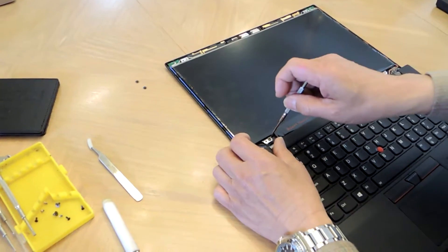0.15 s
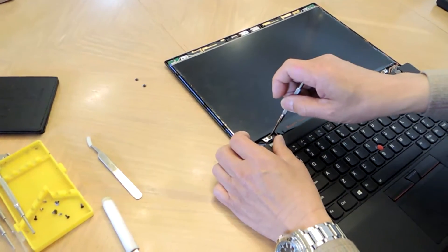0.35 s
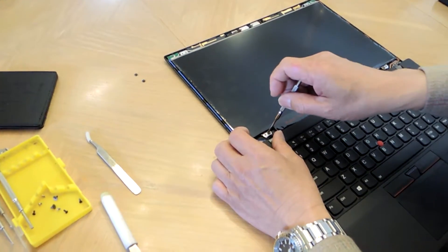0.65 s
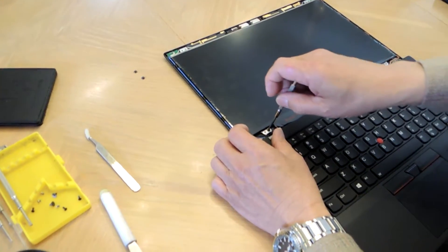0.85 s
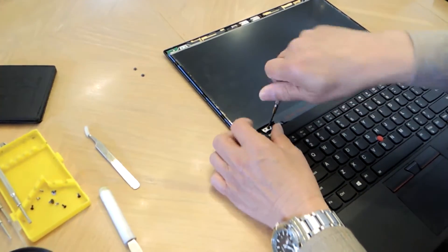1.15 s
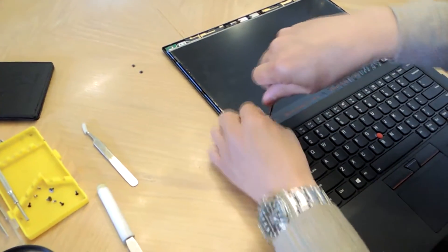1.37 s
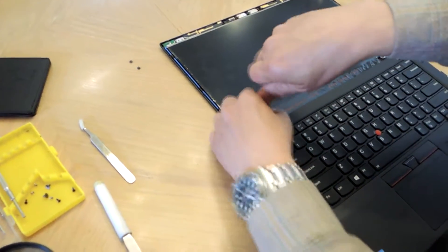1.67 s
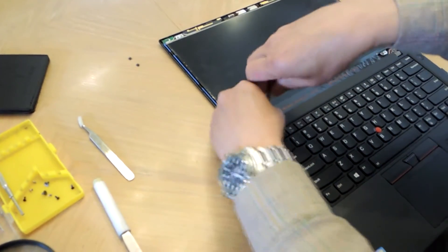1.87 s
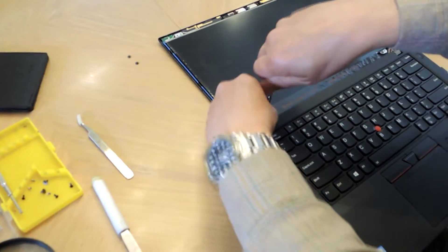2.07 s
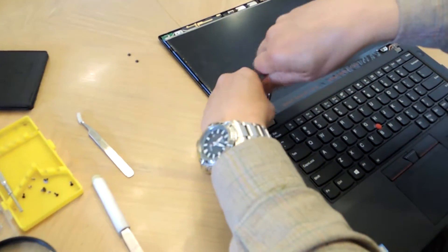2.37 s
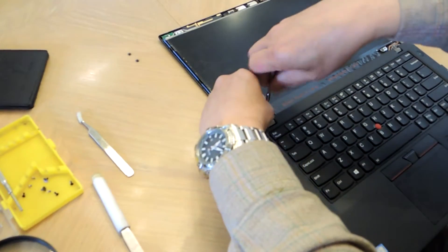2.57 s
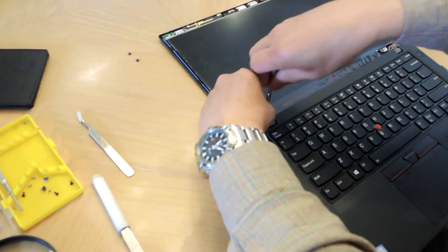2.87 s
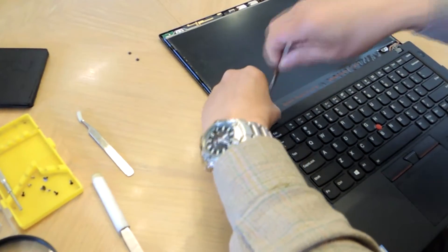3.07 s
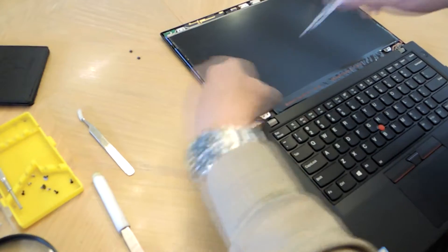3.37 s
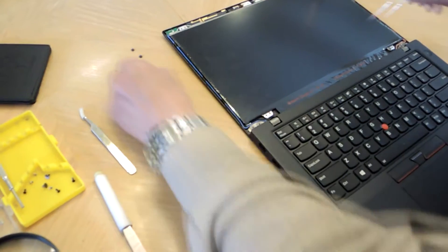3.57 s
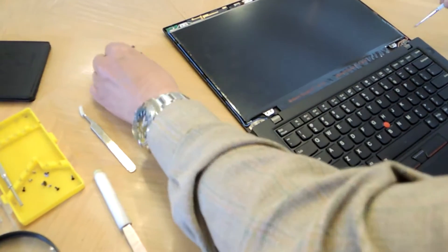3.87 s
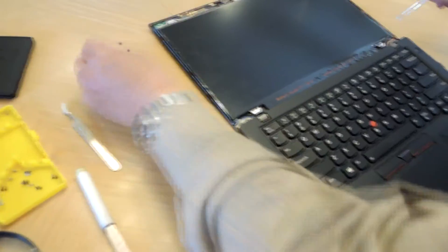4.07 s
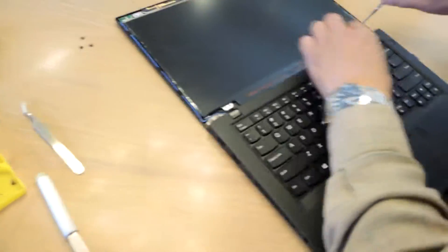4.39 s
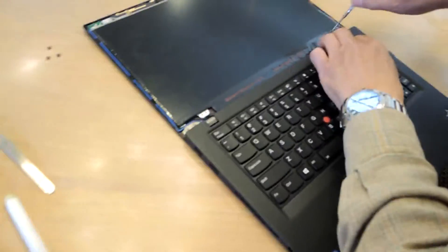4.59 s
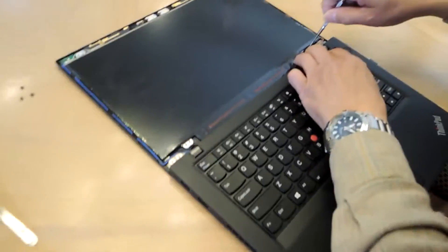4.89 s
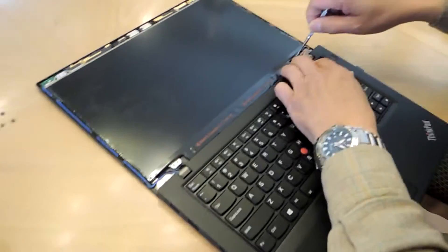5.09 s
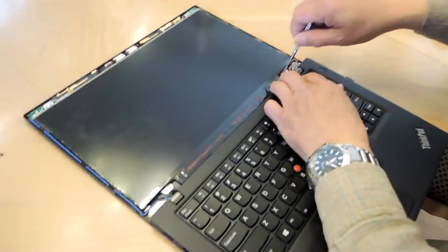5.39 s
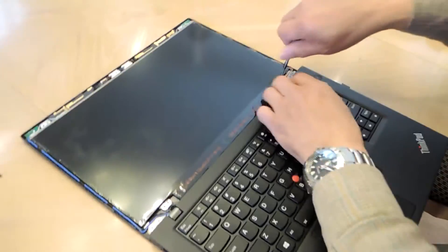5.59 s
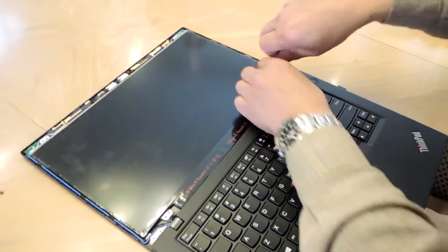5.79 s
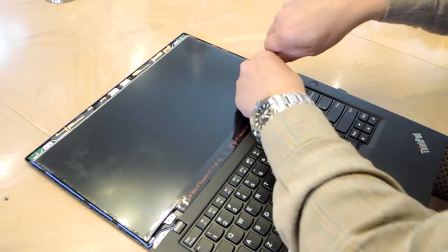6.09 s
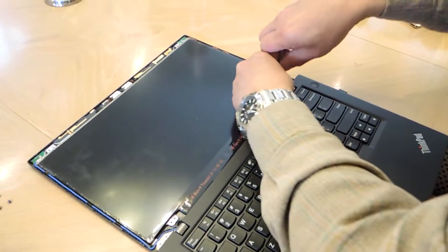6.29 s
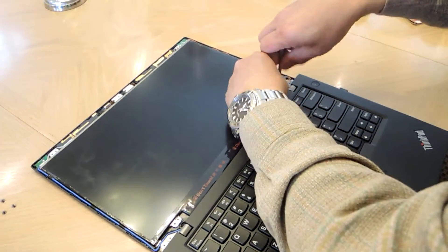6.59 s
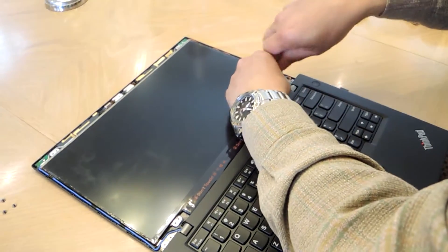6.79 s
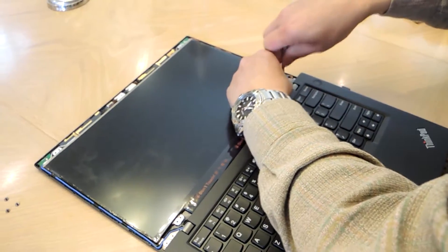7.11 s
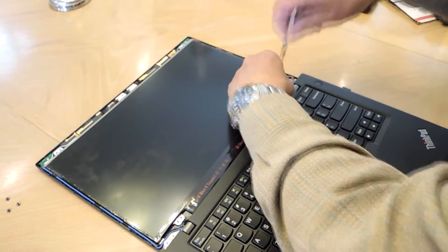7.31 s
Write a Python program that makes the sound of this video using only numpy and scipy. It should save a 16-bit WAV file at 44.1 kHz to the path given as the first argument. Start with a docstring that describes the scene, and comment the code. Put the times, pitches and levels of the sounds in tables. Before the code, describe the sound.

Steel tweezers click, scrape and skid sharply on a laptop hinge, the loose lid clacking, while a sleeve rustles in a quiet ventilated room.

```python
"""Small quiet room, wooden table: steel tweezers work at the hinges of an open laptop, close to the microphone.
Tips tap, scrape, skid and squeal; the loose lid knocks at its hinge; tiny screws drop on the table.
Fingers bump and rub the case and a sleeve swishes, over ventilation, hiss and mains hum.
Contacts are noise bursts and snaps through a colour filter, some with damped modes, plus reflections.
Rubbing and ventilation are coloured, grainy noise; squeal and hum are sines."""
import sys
import numpy as np
from scipy import signal
from scipy.fft import rfft, irfft, next_fast_len
from scipy.io import wavfile
from scipy.ndimage import uniform_filter1d, map_coordinates

SR = 44100
rng = np.random.default_rng(int(sys.argv[2]) if len(sys.argv) > 2 else 0)


def log_audio(samples):
    """Write samples as a 16-bit WAV file to the path given in sys.argv[1]."""
    # one column per channel
    frames = np.atleast_2d(samples).T
    # limit to full scale, then quantise
    limited = np.clip(frames, -1, 1)
    pcm = np.round(limited * 32767).astype(np.int16)
    wavfile.write(sys.argv[1], SR, pcm)


N = 328545
SIZE = 16384  # samples per contact
LEAD_S, LEVEL_WINDOW_S = 0.06, 0.01
AGE_S = np.arange(SIZE) / SR
HZ = np.fft.rfftfreq(SIZE, 1 / SR)
TOP_HZ = 14350

# Room noise colour: [pitch_hz, gain_db]
AIR = [(20, -54), (54, -4), (87, -9.5), (155, -1), (294, -11), (387, -12.5), (445, -14), (774, -11),
       (966, -14.5), (1210, -12.5), (2280, -24.5), (2850, -19.5), (13800, -23), (15000, -38)]
# Left-right likeness of diffuse sound: [pitch_hz, correlation]
ALIKE = [(60, 0.83), (180, 0.86), (550, 0.75), (1640, 0.59), (4950, 0.25), (14900, 0.099)]
# Side signal of near contacts: [pitch_hz, side_db]
WIDTH = [(300, -49), (2000, -25), (6000, -8), (9000, -4), (13500, -1.5)]
# Room decay: [pitch_hz, t60_s]
ROOM = [(150, 0.3), (600, 0.32), (2000, 0.32), (8000, 0.33), (14000, 0.18)]
# Room tail colour: [pitch_hz, gain_db]
ROOM_SEND = [(200, 2.5), (1000, -5.5), (2500, -10.5), (8000, -12), (14000, -11.5)]
AIR_DB, HUM_DB, HUM_HZ = -54, -66, 120

# Fingers slide on the case: [fastest_s, level_db, length_s]
SLIDES = [(1.19, -54.5, 0.22), (1.65, -61.5, 0.95), (2.45, -52, 1), (2.94, -49, 0.11), (5.84, -57.5, .2),
          (6.5, -59.5, 0.77), (6.925, -48, 0.11)]
# Finger rub colour: [pitch_hz, gain_db]
FINGER_COLOUR = [(100, -22), (250, -3.5), (400, -1.5), (480, -2.5), (580, -4), (800, -12), (2000, -8),
                 (4500, -18.5), (9000, -31)]
# Sleeve swishes as the arm moves: [fastest_s, level_db, length_s]
SWISHES = [(1.52, -52.5, 0.81), (2.2, -55, 0.56), (2.7, -54, 0.79), (3.72, -56, 0.39), (4.06, -52.5, 0.29),
           (4.6, -57, 1.7), (5.9, -51.5, 0.35), (6.24, -53.5, 0.34), (6.51, -52, 0.076),
           (6.85, -50.5, 0.083)]
# Sleeve colour: [pitch_hz, gain_db]
SLEEVE_COLOUR = [(1200, -20), (2500, 1.5), (9000, 5.5), (14400, -0.5)]
RESTING_RUB_DB, RESTING_SLEEVE_DB = -61.5, -62.5  # the hands are never quite still

# Tweezer tips strike the frame: [contact_s, level_db, hardness_db_per_octave]
TAPS = [(0.6093, -30, -2), (0.6221, -29.5, 0.5), (0.6756, -44.5, -3), (0.7218, -38, -4),
        (0.8609, -27, -0.5), (0.876, -15, 3), (0.882, -24, 3.5), (.8925, -36, 0), (0.913, -35, 3),
        (0.9483, -42.5, -4.5), (1.7073, -42, -6.5), (2.6137, -35, -4), (3.249, -38.5, -1.5), (5.32, -29, 0),
        (5.3242, -39, -1), (6.18, -45.5, -2), (7.2227, -38, -1)]
# Tap colour: [pitch_hz, gain_db]
TAP_COLOUR = [(60, -54), (220, -5), (400, -9.5), (1000, -8.5), (1700, -6.5), (2500, -8), (4100, -2),
              (5000, -4.5), (6300, 1.5), (8000, -2), (10000, -3), (13000, -9), (15000, -11.5)]
# Tweezer modes: [pitch_hz, level_db, t60_s]
STEEL_MODES = [(4200, -12, 0.014), (7140, -20, 0.035), (7650, -8, 0.018), (8260, -3.5, 0.008),
               (8720, -8, 0.029)]
# Lid modes: [pitch_hz, level_db, t60_s]
LID_MODES = [(336.5, -13.5, 0.082), (580, -12, 0.058), (1016, -10.5, 0.036), (1294, -9.5, 0.023),
             (1766, -7.5, 0.0077)]
# Scrape before a tap, chatter after one of usual level; a stronger tap chatters longer
TAP_LEAD_IN_S, TAP_CHATTER_S, USUAL_TAP_DB, CHATTER_DOUBLES_DB = 0.00028, 0.0026, -35, 29

# Tip drags over the frame: [contact_s, level_db, hardness_db_per_octave, swell_s]
SCRAPES = [(0.745, -47, -2, 0.0081), (0.845, -38, 1.5, 0.0073), (1.927, -37.5, 7, 0.011),
           (2.264, -43.5, 4, 0.011), (2.586, -39, 2.5, 0.027), (2.902, -42, 1.5, 0.049),
           (3.265, -44.5, 3, .002), (4.884, -40.5, -3.5, 0.0033), (5.961, -49.5, -3.5, 0.0053),
           (6.283, -43.5, 2.5, 0.012), (6.606, -38.5, 0.5, 0.052), (6.893, -36, -0.5, 0.012),
           (6.928, -42, -1, .005), (7.19, -36.5, -1, 0.027)]
# Scrape colour: [pitch_hz, gain_db]
SCRAPE_COLOUR = [(60, -47), (400, -5), (1300, 4.5), (2100, 7.5), (2900, 8), (5000, 3), (10000, 0),
                 (14000, -10.5)]
SCRAPE_FADE_S = 0.027

# Lid knocks at its hinge: [contact_s, level_db, hardness_db_per_octave, grind_s]
KNOCKS = [(.861, -32, -0.5, 0.0024), (2.6106, -39, -1, 0.00048), (2.9223, -39, 1.5, 0.0035),
          (4.8557, -27.5, 0.7, 0.00037), (4.879, -31, 2, 0.0013), (5.0904, -48.5, -0.5, 0.0019),
          (5.2503, -25, 1.1, .0004), (5.313, -30.5, 0.5, 0.0016), (5.411, -45.5, -2, 0.0011),
          (5.428, -33, -3.5, 0.00099), (5.5087, -25.5, -3.5, 0.00032), (5.8155, -50.5, -4, 0.0012),
          (5.848, -49, -2, 0.0011), (6.879, -33.5, -1.5, 0.00084), (6.9112, -33.5, 0, 0.00047),
          (6.919, -38, 4, 0.0023), (6.9343, -39, -10, 0.0012), (6.9464, -43, -3, 0.00088),
          (6.9656, -47, 2.5, .001), (7.14, -49.5, -0.5, .001), (7.182, -43, 1, 0.0036),
          (7.2025, -33.5, 5, 0.00077)]
# Knock colour: [pitch_hz, gain_db]
KNOCK_COLOUR = [(60, -22.5), (200, -13), (320, -2.5), (440, -14.5), (580, 2.5), (800, -5), (1250, 4),
                (2000, 1), (2900, -6.5), (4300, -0.5), (6000, -2.5), (8500, -12.5), (11000, -15.5),
                (15000, -32)]
# Each hinge has its own brief resonance
LEFT_HINGE_HZ, RIGHT_HINGE_HZ, HINGE_WIDTH_HZ, HINGE_DB = 1800, 2043, 220, 11
CHANGE_HINGE_S = 4
KNOCK_SNAP_DB, GRIND_HALVES_SNAP_S = 10, 0.0011
# A hard knock moves the panel less: bass dB lost per unit of hardness
PANEL_DB, PANEL_LOSS, PANEL_WIDTH_HZ = -1, 1.8, 900

# Fingers bump the case: [contact_s, level_db]
BUMPS = [(1.1299, -45), (1.162, -50.5), (1.311, -40.5), (2.925, -47), (3.249, -46), (5.468, -46)]
# Bump colour: [pitch_hz, gain_db]
BUMP_COLOUR = [(30, -23), (100, 1.5), (210, -2.5), (340, -10.5), (560, -2.5), (850, -13.5), (2200, -25),
               (5000, -45)]
# Case modes: [pitch_hz, level_db, t60_s]
CASE_MODES = [(122, 9, 0.037), (530, -7, 0.025), (720, -2, 0.05)]

# Tip skids on metal: [contact_s, level_db, fall_s, low_squeak_hz, low_boost_db, high_boost_db]
SKIDS = [(1.5275, -40.5, 0.0068, 11400, 11, -1), (1.5627, -17.5, 0.011, 7770, 8.5, 15.5),
         (1.578, -30, 0.0046, 8500, 8, 24), (1.594, -33.5, .005, 7700, 19, 30),
         (1.6335, -44, .001, 8400, 10, 19), (1.9097, -28, 0.0043, 10100, 14, 12),
         (1.95, -38, .0012, 8500, 8, 16), (1.9563, -28, 0.00087, 9750, 10, 13.5),
         (2.5862, -26, 0.0008, 8800, -3, 37), (6.289, -30.5, 0.0016, 9300, 8, 15.5),
         (6.295, -39.5, 0.0008, 9200, 17, 8), (6.59, -35.5, 0.0023, 10600, 7, 18)]
# Skid colour: [pitch_hz, gain_db]
SKID_COLOUR = [(60, -34), (300, -24), (2600, -8.5), (4200, 0.5), (5800, -1.5), (7000, 3.5), (10000, 4),
               (14000, 0.5)]
SKID_RISE_S, UPPER_SQUEAK_HZ = 0.0014, 13440

# Tip squeals thinly: [time_s, pitch_hz, level_db]
SQUEAL = [(2.68, 11400, -78), (2.75, 10500, -68), (2.82, 9960, -56), (2.89, 9900, -63), (3.06, 9700, -70)]

# Screws land on the table: [contact_s, level_db]
SCREWS = [(3.8633, -35.5), (3.8938, -38), (3.9308, -37.5)]
# Screw tick colour: [pitch_hz, gain_db]
SCREW_COLOUR = [(60, -33), (400, -23), (1100, -12), (2000, -1.5), (4500, -0.5), (9000, 3.5), (11500, -10),
                (15000, -9)]
BOUNCE_S, BOUNCE_LOSS_DB = 0.044, 8.5


def amp(db):
    """Decibels to gain."""
    return 10 ** (np.asarray(db) / 20)


def unit(x):
    """Scale to rms 1."""
    return x / np.sqrt(np.mean(x ** 2) + 1e-20)


def one_blow(x):
    """Scale to mean energy 1 per channel."""
    return unit(x) / np.sqrt(x.shape[-1])


def along(points, hz):
    """Interpolate (Hz, value) points on a log frequency axis."""
    point_hz, value = np.transpose(points)
    return np.interp(np.log(hz + 1), np.log(point_hz + 1), value)


def peak(hz, width_hz):
    """Resonance bump of height 1."""
    return 1 / (1 + ((HZ - hz) / width_hz) ** 2)


def wobble(rate_hz):
    """Smooth random curve, rate_hz knots a second."""
    knots = rng.standard_normal(int(N * rate_hz / SR) + 4)
    return map_coordinates(knots, [np.arange(N) * rate_hz / SR])


def filtered(x, response):
    """Filter x by a zero-phase response of frequency."""
    size = x.shape[-1]
    padded = next_fast_len(size + SIZE)
    spectrum = rfft(x, padded) * response(np.fft.rfftfreq(padded, 1 / SR))
    return irfft(spectrum, padded)[..., :size]


def struck(force, colour_db):
    """Causal (minimum-phase) answer of a body with this colour."""
    cepstrum = irfft(np.log(amp(colour_db) + 1e-6))
    cepstrum[1:SIZE // 2] *= 2
    cepstrum[SIZE // 2 + 1:] = 0
    return irfft(rfft(force) * np.exp(rfft(cepstrum)))


def diffuse(pair):
    """Mix two unrelated signals into left and right, alike in the bass."""
    def mid_side_gain(hz):
        turn = np.arccos(np.clip(along(ALIKE, hz), -1, 1)) / 2
        return np.array([np.cos(turn), np.sin(turn)])

    mid, side = filtered(pair, mid_side_gain)
    return np.array([mid + side, mid - side])


def spread(pair):
    """A near source reaches both microphones alike, except in the treble."""
    side = filtered(pair[1], lambda hz: amp(along(WIDTH, hz)))
    return one_blow(np.array([pair[0] + side, pair[0] - side]))


def ring(modes, detune, scatter_db=2):
    """Damped modes; grip shifts their pitch, point of contact their strength."""
    t = np.maximum(AGE_S - LEAD_S, 0)
    out = np.zeros((2, SIZE))
    for hz, db, t60_s in modes:
        phase = rng.uniform(0, 2 * np.pi, (2, 1))
        pitch_hz = hz * (1 + detune * rng.standard_normal())
        envelope = amp(-60 * t / t60_s) * (1 - np.exp(-t * hz * 2))
        wave = np.sin(2 * np.pi * pitch_hz * t + phase) * envelope
        out += amp(db + scatter_db * rng.standard_normal()) * one_blow(wave)
    return out


def chatter(rise_s, fall_s, rough):
    """Microscopic slips swell up to a contact and die away after it."""
    t = AGE_S - LEAD_S
    swell = np.exp(np.where(t < 0, t / max(rise_s, 1e-5), -t / max(fall_s, 1e-4)))
    grain = np.exp(rough * unit(uniform_filter1d(rng.standard_normal(SIZE), size=16)))
    return one_blow(swell * grain * rng.standard_normal((2, SIZE)))


def contact(colour, hardness, rise_s, fall_s, snap_db, rough):
    """One sharp snap amid chatter; a harder contact is brighter."""
    force = chatter(rise_s, fall_s, rough)
    at = round(LEAD_S * SR)
    force[0, at] += amp(snap_db)
    force[1, at + 2] += amp(snap_db) * rng.choice([-1, 1])
    octaves = np.log2(np.maximum(HZ / 1500, 1))  # hardness tilts above 1500 Hz
    return one_blow(struck(force, along(colour, HZ) + hardness * octaves))


def in_room(dry, wet_db, near_db, near_t60_s=0.07):
    """Add scatter from the table and screen, then the short tail of the room."""
    hz, t, z = signal.stft(rng.standard_normal((2, SIZE)), SR, nperseg=256)
    decay = amp(-60 * t / along(ROOM, hz)[:, None])
    tail = signal.istft(z * decay, SR, nperseg=256)[1][:, :SIZE]
    tail = one_blow(tail * (1 - np.exp(-AGE_S / 0.004)))
    tail = diffuse(filtered(tail, lambda f: amp(along(ROOM_SEND, f) + wet_db)))
    near_envelope = amp(-60 * AGE_S / near_t60_s) * (1 - np.exp(-AGE_S / 0.0006))
    near = spread(rng.standard_normal((2, SIZE)) * near_envelope)
    reflections = tail + amp(near_db) * near
    return dry + signal.fftconvolve(dry.mean(0)[None], reflections, axes=1)[:, :SIZE]


def add(track, contact_s, level_db, sound):
    """Lay in a contact, its energy 1.5 dB above level_db held for the level window."""
    start = round((contact_s - LEAD_S) * SR)
    part = track[:, start:start + SIZE]
    gain = amp(level_db + 1.5) * np.sqrt(LEVEL_WINDOW_S * SR)
    part += gain * one_blow(sound)[:, :part.shape[1]]


def rush(colour, grain_db):
    """Stereo noise of rms 1, broken into grains."""
    grains = amp(grain_db * (wobble(400) + 1.16 * wobble(35)))
    noise = grains * rng.standard_normal((2, N))
    return unit(diffuse(filtered(noise, lambda hz: amp(along(colour, hz)))))


def strokes(rows, resting_db):
    """Rubbing gain: each movement speeds up and slows down in a bell curve."""
    t = np.arange(N) / SR
    bells = [amp(db) * np.exp(-(2 * (t - s) / length_s) ** 2) for s, db, length_s in rows]
    return np.sqrt(amp(resting_db) ** 2 + np.sum(np.square(bells), axis=0))


def room_noise():
    """Ventilation and hiss as coloured noise, with a faint, wavering mains hum."""
    hum = amp(HUM_DB + 0.72 * wobble(3.25)) * np.sin(2 * np.pi * HUM_HZ * np.arange(N) / SR)
    return amp(AIR_DB) * rush(AIR, grain_db=-0.52) + hum


def finger_rub():
    """Fingers rub on the case: grainy noise follows the speed of each slide."""
    return strokes(SLIDES, RESTING_RUB_DB) * rush(FINGER_COLOUR, grain_db=1.5)


def sleeve_swish():
    """The sleeve swishes as the arm moves: bright noise follows its speed."""
    return strokes(SWISHES, RESTING_SLEEVE_DB) * rush(SLEEVE_COLOUR, grain_db=2.13)


def tweezer_taps():
    """Hard taps ring the steel; softer ones ring the lid."""
    out = np.zeros((2, N))
    for s, db, hardness in TAPS:
        fall_s = TAP_CHATTER_S * 2 ** ((db - USUAL_TAP_DB) / CHATTER_DOUBLES_DB)
        click = contact(TAP_COLOUR, hardness, TAP_LEAD_IN_S, fall_s, snap_db=-4, rough=0.3)
        steel = amp(-4.5 + 2.1 * hardness) * ring(STEEL_MODES, detune=0.0033)
        lid = amp(-10.5 - 1.5 * hardness) * ring(LID_MODES, detune=0.031)
        add(out, s, db, in_room(spread(click + steel + lid), wet_db=1.5, near_db=-2))
    return out


def tweezer_scrapes():
    """A dragged tip catches and slips in a dense, uneven rasp."""
    out = np.zeros((2, N))
    for s, db, hardness, swell_s in SCRAPES:
        rasp = contact(SCRAPE_COLOUR, hardness, swell_s, SCRAPE_FADE_S, snap_db=-np.inf, rough=0.76)
        add(out, s, db, in_room(spread(rasp), wet_db=-7.0, near_db=-2.5))
    return out


def hinge_knocks():
    """The lid clacks or grinds; the small hinge is heard directly, the broad panel fills the room."""
    out = np.zeros((2, N))
    for s, db, hardness, grind_s in KNOCKS:
        snap_db = KNOCK_SNAP_DB - 20 * np.log10(2) * grind_s / GRIND_HALVES_SNAP_S
        clack = spread(contact(KNOCK_COLOUR, hardness, 1.14 * grind_s, grind_s, snap_db, rough=0.46))
        bass_db = (PANEL_DB - PANEL_LOSS * hardness) * peak(0, PANEL_WIDTH_HZ)
        lid = amp(-9.5) * spread(ring(LID_MODES, detune=0.019))
        panel = struck(clack + lid, bass_db)
        hinge_hz = LEFT_HINGE_HZ if s < CHANGE_HINGE_S else RIGHT_HINGE_HZ
        # only what the resonance adds
        hinge = struck(clack, HINGE_DB * peak(hinge_hz, HINGE_WIDTH_HZ)) - clack
        add(out, s, db, hinge + in_room(panel, wet_db=-3.0, near_db=-6.5))
    return out


def finger_bumps():
    """Soft flesh gives a dull push with a slight tick, moving only the low modes of the case."""
    out = np.zeros((2, N))
    for s, db in BUMPS:
        push = contact(BUMP_COLOUR, hardness=0, rise_s=0, fall_s=0.002, snap_db=22, rough=0)
        case = amp(-17.5) * ring(CASE_MODES, detune=0.03)
        add(out, s, db, in_room(spread(push + case), wet_db=-5.0, near_db=3.0))
    return out


def tweezer_skids():
    """Stick and slip pumps two resonances of the tip; the lower one shifts with the grip."""
    out = np.zeros((2, N))
    treble = along([(6000, 0), (6600, 1)], HZ)
    for s, db, fall_s, low_hz, low_db, high_db in SKIDS:
        # a forceful skid throws its energy into the high bending modes
        bite_db = 1.2 * max(db + 28.0, 0)
        colour_db = along(SKID_COLOUR, HZ) + bite_db * treble
        colour_db += low_db * peak(low_hz, width_hz=710)
        colour_db += high_db * peak(UPPER_SQUEAK_HZ, width_hz=540)
        squeak = one_blow(struck(chatter(SKID_RISE_S, fall_s, rough=0.48), colour_db))
        steel = amp(bite_db - 17.5) * ring(STEEL_MODES[1:], detune=0.019)
        add(out, s, db, in_room(spread(squeak + steel), wet_db=1.5, near_db=-9.0))
    return out


def thin_squeal():
    """A faint, unsteady whistle of metal on metal sinks as the tip slows."""
    time_s, hz, db = np.transpose(SQUEAL)
    t = np.arange(N) / SR
    pitch_hz = np.interp(t, time_s, hz) + 130 * wobble(500)
    level_db = np.interp(t, time_s, db, left=-np.inf, right=-np.inf) + 3.8 * wobble(60)
    return amp(level_db) * np.sin(2 * np.pi * np.cumsum(pitch_hz) / SR)


def screws():
    """Screws too small to ring tick on the wood and hop once."""
    out = np.zeros((2, N))
    hops = [(s + BOUNCE_S, db - BOUNCE_LOSS_DB) for s, db in SCREWS]
    for s, db in SCREWS + hops:
        tick = contact(SCREW_COLOUR, hardness=0, rise_s=0, fall_s=0.0015, snap_db=-12, rough=0.66)
        add(out, s, db, in_room(spread(tick), wet_db=3.5, near_db=-7))
    return out


def scene():
    """Sum all sounds of the workbench."""
    background = room_noise() + finger_rub() + sleeve_swish()
    tweezers = tweezer_taps() + tweezer_scrapes() + tweezer_skids() + thin_squeal()
    return background + tweezers + hinge_knocks() + finger_bumps() + screws()


def record(dry):
    """The recorder clips just under full scale, then cuts steeply above its band limit."""
    return filtered(np.clip(dry, -0.9, 0.9), lambda hz: 1 / np.sqrt(1 + (hz / TOP_HZ) ** 200))


dry = scene()
out = record(dry)
log_audio(out)
```